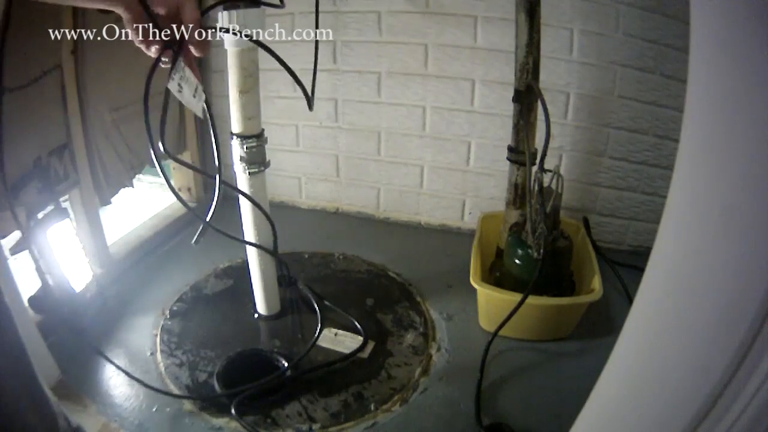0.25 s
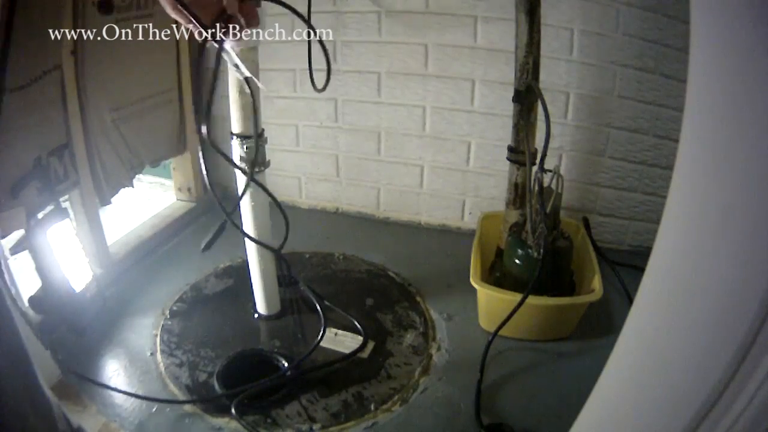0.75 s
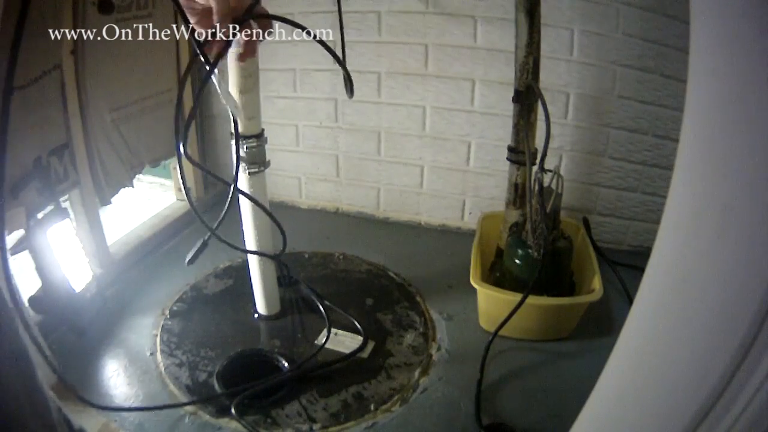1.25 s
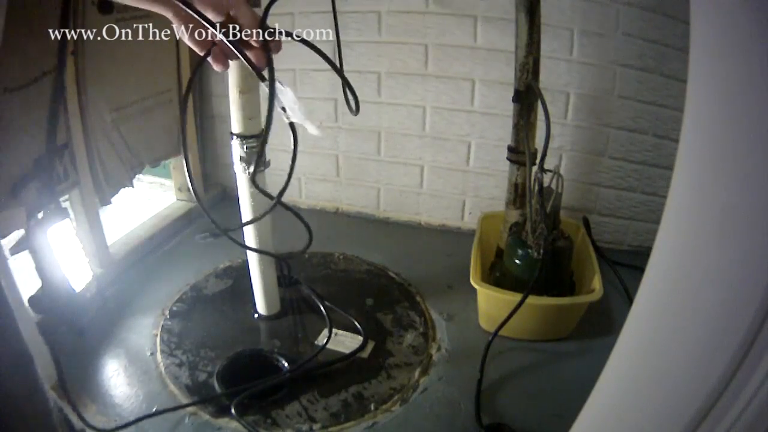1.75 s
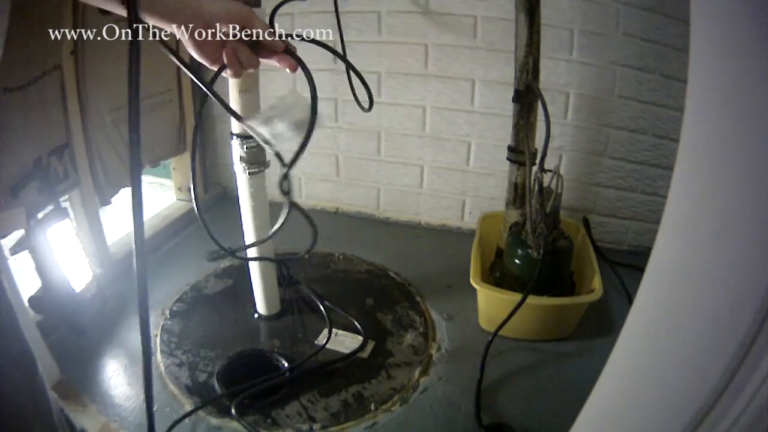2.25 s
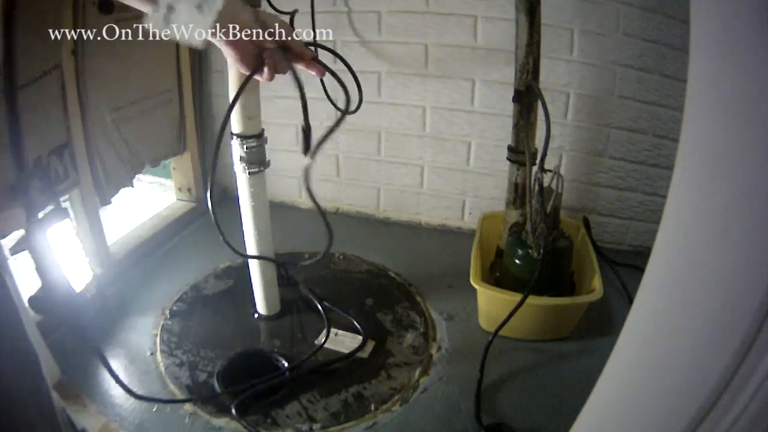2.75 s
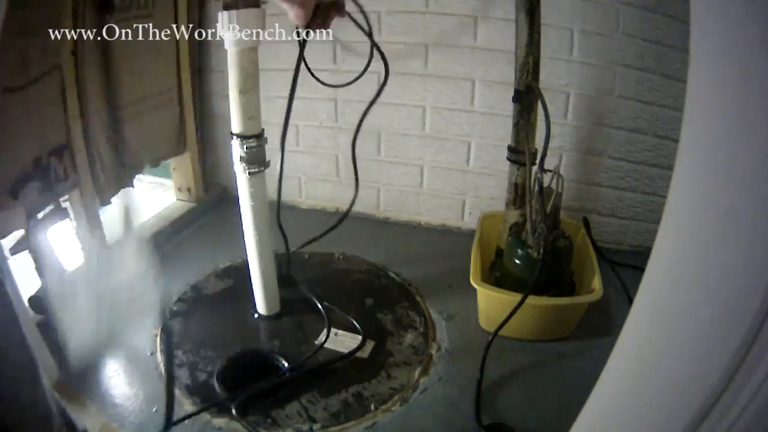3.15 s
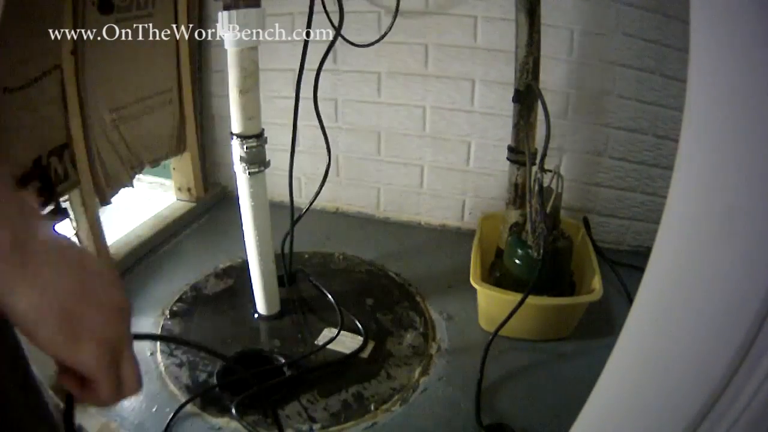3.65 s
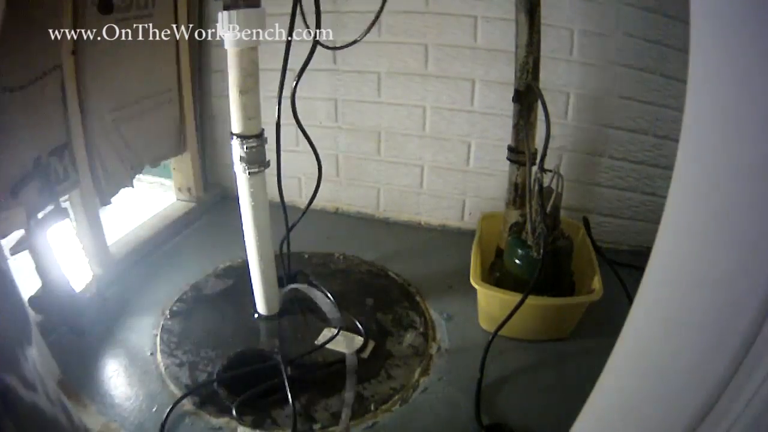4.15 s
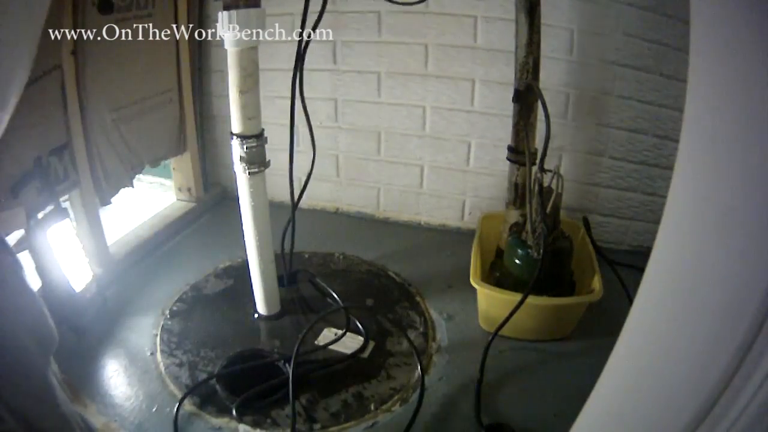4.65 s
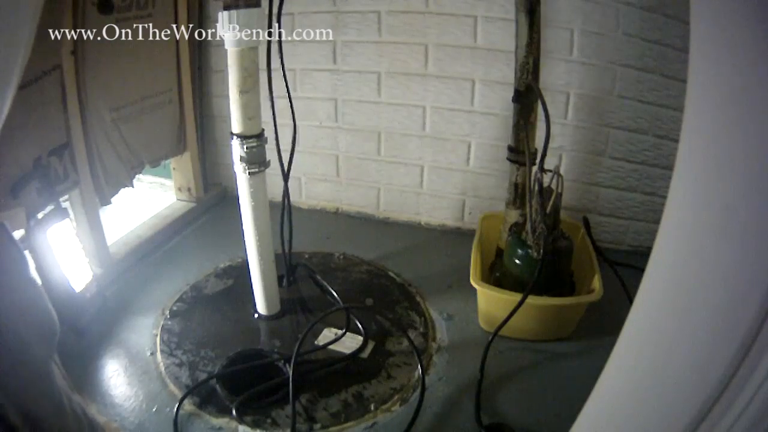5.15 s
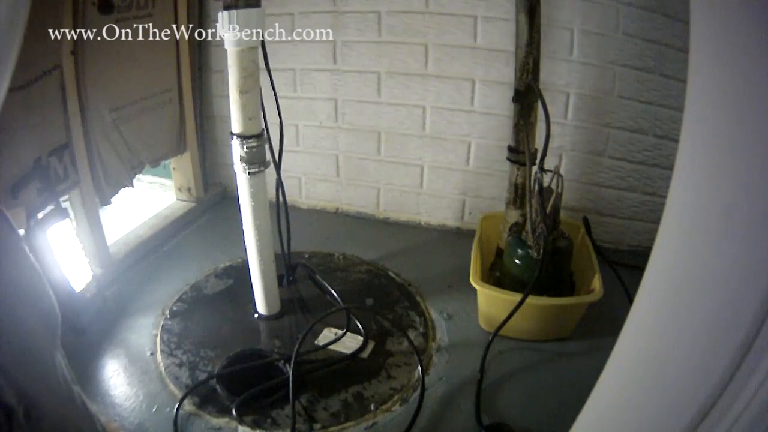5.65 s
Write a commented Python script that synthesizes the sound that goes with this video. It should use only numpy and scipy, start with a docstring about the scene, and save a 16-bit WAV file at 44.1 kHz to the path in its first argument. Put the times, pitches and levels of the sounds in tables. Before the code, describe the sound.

Water trickles and drips in a basement pit while handled cords tick and a tag snaps sharply, over soft pulsing electrical thumps and hiss.

```python
"""Water trickles, splashes and drips in a basement sump pit while cords and their tags are handled above
it; one tag snaps sharply. The water is fizzing noise and tiny bubbles over a gurgle that rings the air of
the pit; the cords tick, rustle and knock on the lid. A small camera hears it all through a microphone
port that rings near 5 kHz. Its circuits hiss, whine and draw current in bursts about four times a second,
and each sag of the supply thumps in the sound."""
import sys
import numpy as np
from scipy import signal
from scipy.fft import rfft, irfft, next_fast_len
from scipy.io import wavfile
from scipy.ndimage import uniform_filter1d, map_coordinates

SR = 44100
rng = np.random.default_rng(int(sys.argv[2]) if len(sys.argv) > 2 else 0)


def wrap_up_sound(samples):
    """Save the sound to the file named by the first command line argument, as 16-bit audio."""
    columns = np.atleast_2d(samples).T
    # keep every value between -1 and 1, then stretch to whole-number steps
    tamed = np.clip(columns, -1, 1)
    steps = np.round(tamed * 32767).astype(np.int16)
    wavfile.write(sys.argv[1], SR, steps)


N = 260190


def amp(db):
    """Decibels to gain."""
    return 10 ** (np.asarray(db) / 20)


def unit(x):
    """x scaled to an rms of 1."""
    return x / np.sqrt(np.mean(x ** 2) + 1e-20)


def along(points, hz):
    """Read a curve of (freq_hz, value) points on a log frequency axis."""
    freqs, values = np.transpose(points)
    return np.interp(np.log(hz + 1), np.log(freqs + 1), values)


def wobble(rate):
    """A smooth random drift with rate turning points a second."""
    knots = rng.standard_normal(int(N * rate / SR) + 4)
    return map_coordinates(knots, [np.arange(N) * rate / SR])


def filtered(x, response):
    """Pass x through a complex frequency response."""
    size = next_fast_len(x.shape[-1] + 8192)
    return irfft(rfft(x, size) * response(np.fft.rfftfreq(size, 1 / SR)), size)[..., :x.shape[-1]]


def resonances(modes):
    """The response of ringing modes (pitch_hz, width_hz, gain_db), alternating in polarity."""
    return lambda f: sum((-1) ** k * amp(db) * 1j * f * width / (hz * hz - f * f + 1j * f * width)
                         for k, (hz, width, db) in enumerate(modes))


def patchy_noise(depth_db):
    """White noise that flickers in random patches of time and frequency."""
    spectrum = signal.stft(rng.standard_normal(N + 512), nperseg=256)[2]
    patches = uniform_filter1d(rng.standard_normal(spectrum.shape), 4, axis=0)
    patches = uniform_filter1d(patches, 8, axis=1)
    return unit(signal.istft(spectrum * amp(depth_db * unit(patches)), nperseg=256)[1][:N])


def burst(hz, width_hz, rise_s, t60_s):
    """Noise, band-passed twice around one pitch, that swells and dies."""
    t = np.arange(SR // 8) / SR
    band = resonances([(hz, width_hz, 0)])
    noise = unit(filtered(rng.standard_normal(len(t)), lambda f: band(f) ** 2))
    return noise * amp(-60 * t / t60_s) * (1 - np.exp(-t / rise_s))


def basement(x):
    """The room's reverb alone: a fresh noise tail whose treble dies first."""
    # decay of the room: freq_hz, t60_s
    decay = [(1000, 0.29), (5000, 0.17), (12000, 0.027)]
    hz, t, spectrum = signal.stft(rng.standard_normal(SR // 3), SR, nperseg=128)
    tail = signal.istft(spectrum * amp(-60 * t / along(decay, hz)[:, None]), SR, nperseg=128)[1]
    return signal.fftconvolve(np.pad(x, (70, 0)), tail / np.linalg.norm(tail))


def place(out, start_s, hit, wet_db):
    """Mix in a hit with its own reverb."""
    wet = amp(wet_db) * basement(hit)
    out[round(start_s * SR):][:len(hit)] += hit
    out[round(start_s * SR):][:len(wet)] += wet


def circuit_noise():
    """The circuits' steady hiss and thin whine in the centre, with a fainter hiss out wide."""
    # spectrum of the hiss that both channels share: freq_hz, density_db
    centre_shape = [(15, -37), (25, -3), (192, -10), (777, -7.5), (1440, -10), (2820, -16), (3060, -33),
                    (4950, -13), (7020, -21), (12700, -21.5), (15300, -22.5)]
    # spectrum of the hiss that is opposite left and right: freq_hz, density_db
    side_shape = [(250, -26.5), (900, -9.5), (1700, -23.5), (4500, -28.5), (7200, -3.5), (15000, -5.5)]
    # thin tones of the circuits: pitch_hz, level_db
    tones = [(7837.1, -73), (7897.1, -71.5)]
    t = np.arange(N) / SR
    hiss = lambda shape: unit(filtered(rng.standard_normal(N), lambda hz: amp(along(shape, hz))))
    whine = sum(amp(db) * np.sin(2 * np.pi * hz * t) for hz, db in tones)
    centre = whine + amp(-55.5) * hiss(centre_shape)
    side = amp(-65) * hiss(side_shape)
    return np.array([centre + side, centre - side])


def sag_rhythm():
    """The circuits' clock: two main sags a beat, most with others around; (start_s, length_s, depth_db)."""
    # main sags of the supply: delay_s, length_s, depth_db
    first = [(0.051, 0.0089, -35)]
    short_first = [(0.055, 0.005, -40)]
    second = [(0.063, 0.01162, -33)]
    # sags before and after the main pair: delay_s, length_s, depth_db
    lead = [(0.0005, 0.0109, -35.5)]
    flick = [(0.021, 0.00425, -38)]
    trail = [(0.011, 0.00297, -36.5), (0.023, 0.0027, -36.5), (0.031, 0.005, -40)]
    late = [(0.107, 0.0036, -39), (0.113, 0.012, -30)]
    # beats that vary the pattern: beat_number
    short_beats = (1, 4, 12, 13, 20, 22, 23)  # first main sag cut short
    late_beats = (0, 2, 6, 10, 14, 22)  # late sags follow
    light_beats = (6, 18, 22)  # all but the main pair shallower
    idle_beats = (12, 13)  # main pair only
    # main pairs off the beat: start_s, gain_db
    off_beats = [(2.798, -3), (4.548, 0)]
    clock_start_s, beat_s, light_db = -0.1065, 15 / 59.94, -7
    lead_ins = [lead + flick, lead, lead + trail, []]
    sags = []
    for beat in range(24):
        others = [] if beat in idle_beats else lead_ins[beat % 4] + (late if beat in late_beats else [])
        if beat in light_beats:
            others = [(delay, length, db + light_db) for delay, length, db in others]
        main = (short_first if beat in short_beats else first) + second
        onset_s = clock_start_s + beat * beat_s
        sags += [(onset_s + delay, length, db) for delay, length, db in others + main]
    for start_s, gain_db in off_beats:
        sags += [(start_s + delay - first[0][0], length, db + gain_db)
                 for delay, length, db in first + second]
    return [sag for sag in sags if sag[0] >= 0]


def supply_thumps():
    """Blocks of current sag the supply; the coupling capacitor passes each edge, then lets it fade."""
    # one long busy spell that buzzes: start_s, end_s, rate_hz, duty_fraction
    busy_spell = (3.7103, 4.0225, 59.94, .72)
    t, load = np.arange(N) / SR, np.zeros(N)
    for start_s, length_s, depth_db in sag_rhythm():
        load[round(start_s * SR):][:round(length_s * SR)] = amp(depth_db)
    start_s, end_s, rate_hz, duty = busy_spell
    phase = (t - start_s + 0.00066 * wobble(60)) * rate_hz % 1
    load = np.where((t > start_s) & (t < end_s), amp(-36) * (phase < duty), load)
    jumps = np.cumsum(rng.random(N) < 450 / SR)  # the current jumps about 450 times a second
    steps = rng.standard_normal(N)[jumps]
    just_after = (uniform_filter1d(load, size=700, origin=349) > 1e-4) & (load == 0)
    spikes = amp(-38) * just_after * (steps > 1.8)
    load = load * np.clip(1 + 0.5 * steps, .1, 1.6) + spikes
    coupling = lambda hz: 1j * hz / (15.4 + 1j * hz) / (1 + 1j * hz / 800) ** 2
    return -filtered(load, coupling)


def bubbles(count, mid_hz, cycles, spread_db):
    """Tiny bubbles ring as damped sines of random time, pitch and size, washed in the room's reverb."""
    when, pitch, size = rng.random((count, 3)).T
    hz = mid_hz * np.exp(1.3 * (pitch - .5))[:, None]
    t = np.arange(512) / SR
    age = t * hz / cycles
    gain = amp(-spread_db * np.log(size + 1 / 50))[:, None]
    rings = gain * np.sin(2 * np.pi * hz * t) * age * np.exp(-3 * age)
    at = (when * N).astype(int)[:, None] + np.arange(512)
    cloud = unit(np.bincount(at.ravel(), rings.ravel(), N + 512)[:N])
    return unit(basement(cloud)[:N])


def trickle():
    """A bright, bubbly fizz of splashing water over a lower gurgle that rings the air of the pit."""
    # flow of the water: time_s, fizz_db, gurgle_db
    flow = [(0.0, -41.5, -35.5), (0.35, -46.5, -50), (0.65, -45.5, -42), (1.1, -44.5, -46),
            (1.64, -46, -47), (2.2, -45, -49), (3.15, -49, -44), (3.35, -38, -45.5), (3.55, -45.5, -44),
            (3.8, -46.5, -47.5), (4.03, -39, -41.5), (4.17, -51, -50), (4.6, -46.5, -49.5), (5.1, -48, -49),
            (5.62, -56, -52), (5.9, -46.5, -54)]
    # air modes of the pit: pitch_hz, width_hz, gain_db
    pit_modes = [(1586, 57, 3), (1900, 90, 3.5), (2080, 49, 8.5), (2355, 37, 8), (2700, 100, 5.5),
                 (3300, 710, -2.5)]
    t = np.arange(N) / SR
    time_s, fizz_db, gurgle_db = np.transpose(flow)
    fizz_gain = amp(np.interp(t, time_s, fizz_db) + 1.6 * wobble(13))
    fizz = patchy_noise(depth_db=4.5) + .5 * bubbles(count=1500, mid_hz=4800, cycles=36, spread_db=3)
    fizz = filtered(fizz, resonances([(4800, 3600, 0)]))
    pit_air = unit(filtered(patchy_noise(depth_db=4.5), resonances(pit_modes)))
    gurgle = pit_air + .5 * bubbles(count=600, mid_hz=2595, cycles=7.3, spread_db=5)
    gurgle_gain = amp(np.interp(t, time_s, gurgle_db) + 2.1 * wobble(11))
    return fizz_gain * unit(fizz) + gurgle_gain * unit(gurgle)


def splashes_and_drips():
    """A splash is a wide burst of noise; a drip is a narrow one, smeared by the walls of the pit."""
    # broad splashes: start_s, level_db, centre_hz, rise_ms
    splashes = [(0.129, -35.5, 4800, .6), (0.2006, -32.5, 3200, .6), (.47, -32.5, 2690, 5),
                (0.503, -32, 5060, .6), (.615, -29.5, 3300, .6), (.672, -30, 2430, 0.56),
                (0.9556, -34, 4450, .6), (1.0923, -37.5, 5230, .6), (1.203, -38.5, 4900, 0.53),
                (1.255, -33.5, 5470, 5.3), (1.838, -32, 5400, 1.5), (2.0426, -30, 5740, 1.9),
                (2.2093, -39, 5700, .6), (2.284, -34.5, 4930, 6), (2.378, -35, 6000, 4),
                (2.797, -32.5, 4000, 0.54), (2.829, -31.5, 4670, 6.8), (3.188, -35.5, 3480, 2.8),
                (3.3119, -33.5, 4740, 1.4), (3.744, -31, 3080, 5.2), (3.972, -24.5, 4730, 6.9),
                (4.281, -31, 2260, 0.53), (4.322, -36, 4640, 2.5), (4.726, -33.5, 4900, 9.4),
                (4.7657, -35, 4900, 1.3), (5.2715, -40.5, 4450, .6), (5.314, -39, 4440, .6),
                (5.6007, -42, 4600, 1)]
    # the clearest single drips: start_s, pitch_hz, level_db
    drips = [(0.447, 3300, -33), (0.648, 5370, -32), (0.838, 2670, -37), (0.978, 1900, -32.5),
             (1.17, 1630, -33), (1.251, 2300, -34), (1.288, 4900, -31.5), (1.338, 1990, -32.5),
             (2.024, 2970, -35.5), (2.197, 5570, -34), (2.298, 2140, -34), (2.537, 3660, -33),
             (3.076, 2700, -35), (3.34, 2160, -33), (3.635, 1900, -33), (3.939, 1505, -27),
             (4.051, 4930, -33.5), (4.966, 2740, -32.5), (5.269, 2770, -33.5), (5.785, 2290, -35)]
    out = np.zeros(N + SR)
    for start_s, level_db, hz, rise_ms in splashes:
        splash = burst(hz, width_hz=0.6 * hz, rise_s=rise_ms / 1000 + 1e-5, t60_s=0.14)
        place(out, start_s, amp(level_db) * splash, wet_db=-18)
    for start_s, hz, level_db in drips:
        drip = burst(hz, width_hz=260, rise_s=0.0039, t60_s=0.092)
        place(out, start_s, amp(level_db) * drip, wet_db=-6)
    return out[:N]


def lid_knocks():
    """A cord strikes the pit lid: a short blow with a rattle behind it rings the lid's modes."""
    # blows of the cord: start_s, force_db
    knocks = [(2.391, -6), (2.757, -7), (3.213, -7), (3.493, -0.5), (4.087, -6), (4.184, -6.5), (4.358, -9),
              (4.45, -11)]
    # modes of the lid: pitch_hz, width_hz, gain_db
    lid_modes = [(725, 190, 12), (1350, 230, 7), (1780, 370, 6), (3970, 4200, -6)]
    blows, t = np.zeros(N + SR), np.arange(SR // 10) / SR
    impulse, rattle_t60_s = (t == 0), 0.089
    for start_s, force_db in knocks:
        rattle = 0.096 * amp(-60 * t / rattle_t60_s) * rng.standard_normal(len(t))
        blows[round(start_s * SR):][:len(t)] += amp(force_db) * (impulse + rattle)
    return filtered(blows[:N], resonances(lid_modes))


def tag_ticks():
    """Handled cords and tags tick: a millisecond snap with a bright crack and a short rustle after it."""
    # ticks, with crack and rustle relative to the snap: start_s, level_db, crack_db, rustle_db
    ticks = [(0.2619, -33, 16, 0), (0.3645, -23.5, 15.5, -3.5), (0.67, -26, -8, -11),
             (.9682, -28.5, -14, -1), (1.7321, -14.5, 7, -13), (1.8591, 0, -1, -20.5),
             (2.6813, -36.5, -4, 2.5), (4.0887, -31.5, -11, -4), (4.1844, -30.5, -9, -6),
             (4.278, -26, 2, -3.5), (4.3074, -23.5, -2, -14), (4.329, -28, 2, -3), (5.1799, -27.5, -9, -6),
             (5.2139, -32.5, -6, -14), (5.3458, -28, -10, -13), (5.3915, -33.5, -4, -6.5),
             (5.5304, -42, -8, 5)]
    snap_hz, snap_s, crack_decay_s = 5100, .001, .0003
    out, t = np.zeros(N + SR), np.arange(SR // 8) / SR
    arch = np.clip(np.sin(np.pi * np.minimum(t / snap_s, 1)), 0, 1)
    snap = np.sin(2 * np.pi * snap_hz * t) * np.sqrt(arch)
    for start_s, level_db, crack_db, rustle_db in ticks:
        edge = np.exp(-t / crack_decay_s) * np.sign(rng.standard_normal(len(t)))
        crack = amp(crack_db) * np.diff(edge, prepend=0)  # tilted toward the treble
        rustle = amp(rustle_db) * burst(3900, width_hz=7600, rise_s=0.00037, t60_s=0.082)
        place(out, start_s, amp(level_db) * (snap + crack + rustle), wet_db=-16.5)
    return out[:N]


def scene():
    """Water in the pit and cords above it, the same in both channels."""
    return np.tile(trickle() + splashes_and_drips() + tag_ticks() + lid_knocks(), (2, 1))


def record(dry):
    """The microphone port colours the scene, the circuits add thumps and noise, and the top is cut off."""
    # modes of the microphone port: pitch_hz, width_hz, gain_db
    port_modes = [(910, 2550, -13.5), (5020, 1520, -0.5), (12000, 6700, -20.5)]
    top_hz = 15300
    mix = filtered(dry, resonances(port_modes)) + supply_thumps() + circuit_noise()
    return filtered(mix, lambda hz: hz < top_hz)


dry = scene()
out = record(dry)
wrap_up_sound(out)
```